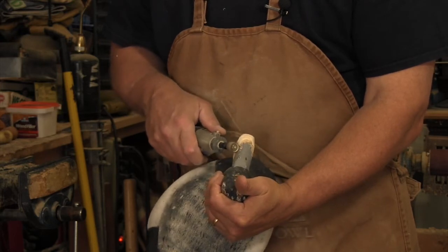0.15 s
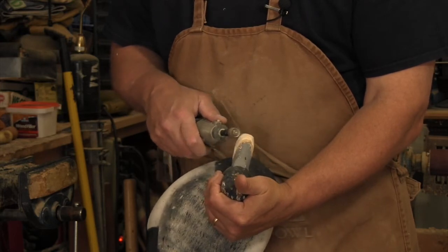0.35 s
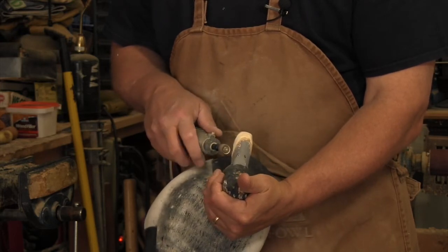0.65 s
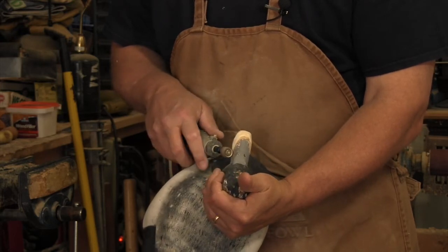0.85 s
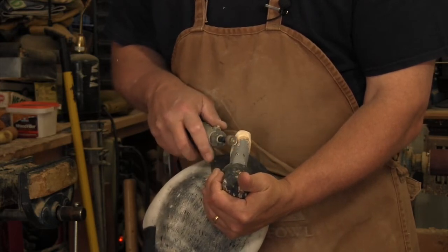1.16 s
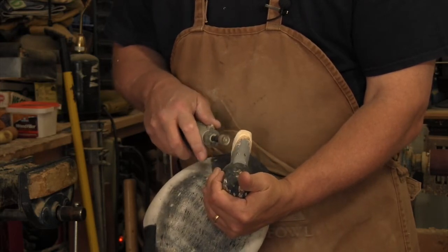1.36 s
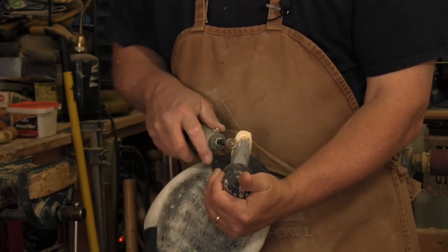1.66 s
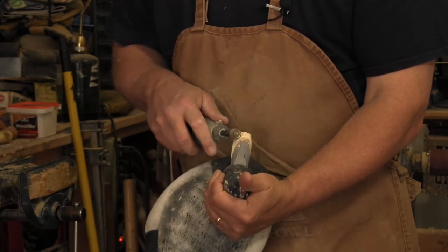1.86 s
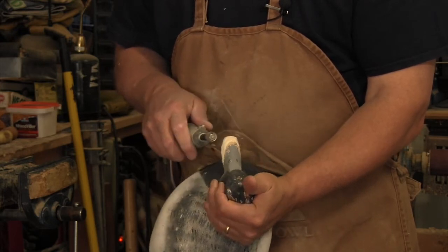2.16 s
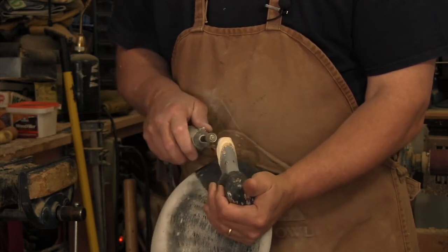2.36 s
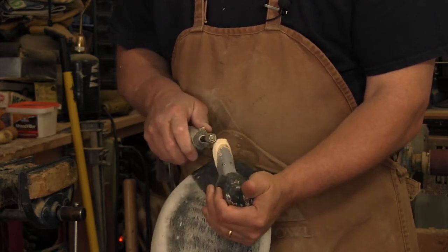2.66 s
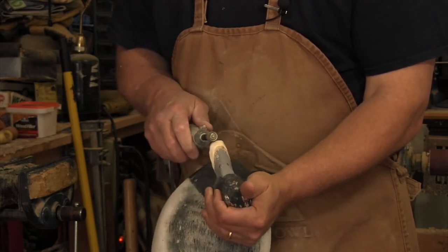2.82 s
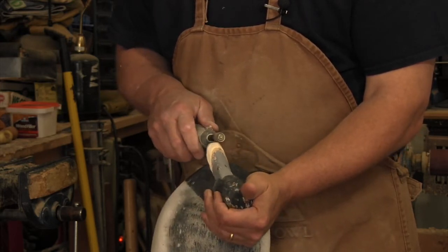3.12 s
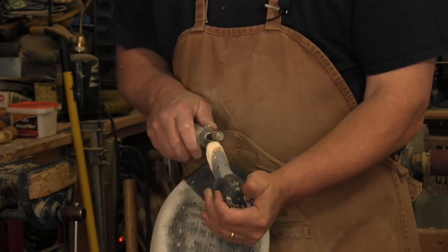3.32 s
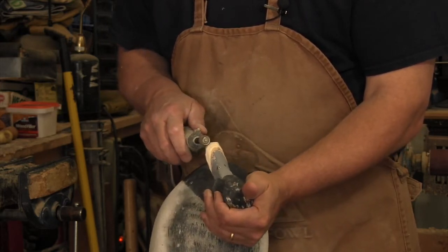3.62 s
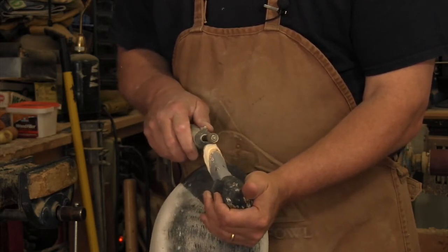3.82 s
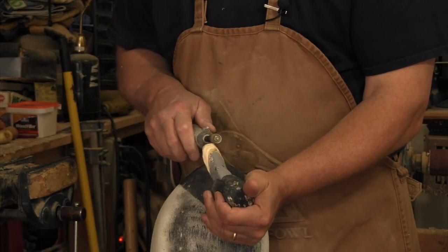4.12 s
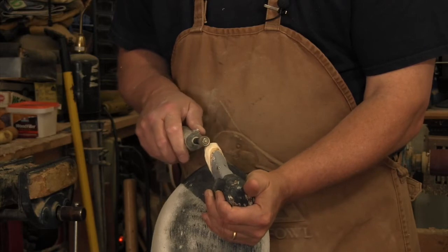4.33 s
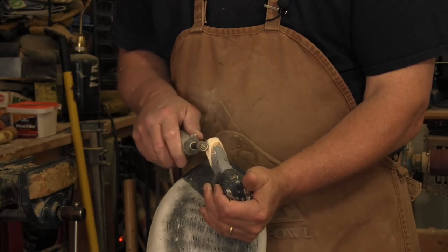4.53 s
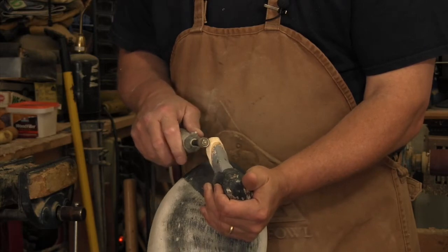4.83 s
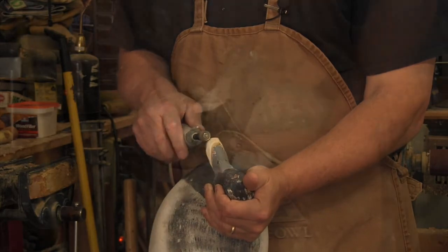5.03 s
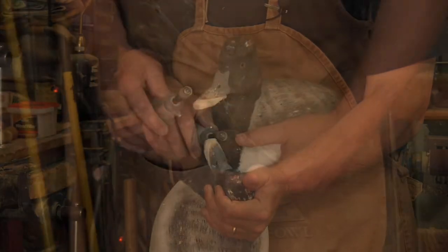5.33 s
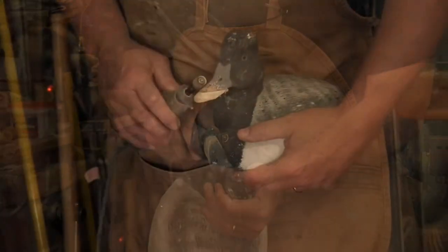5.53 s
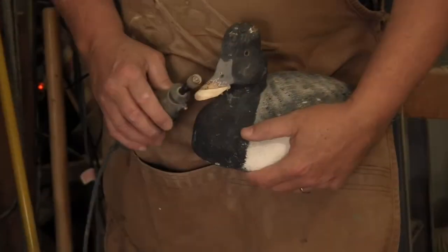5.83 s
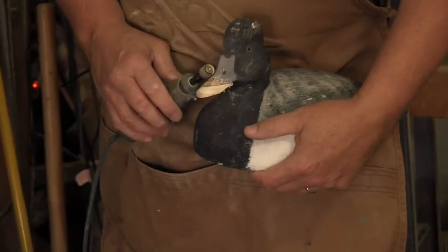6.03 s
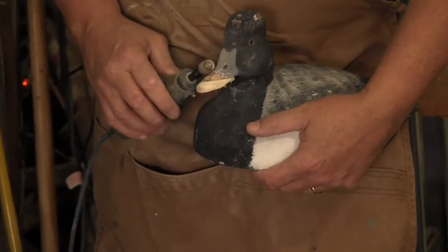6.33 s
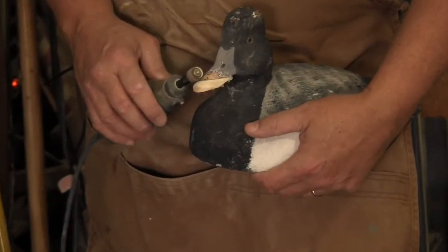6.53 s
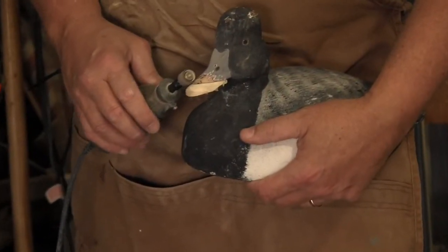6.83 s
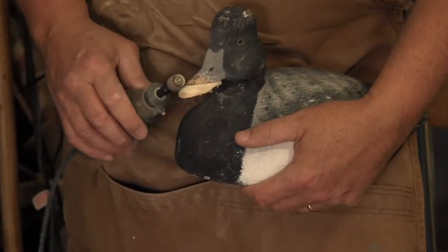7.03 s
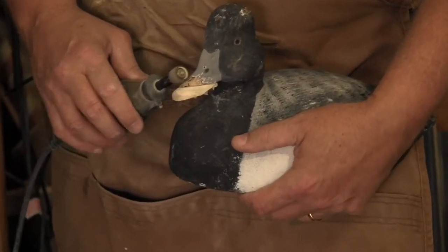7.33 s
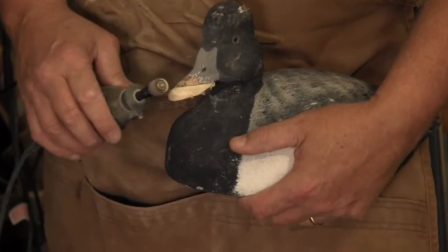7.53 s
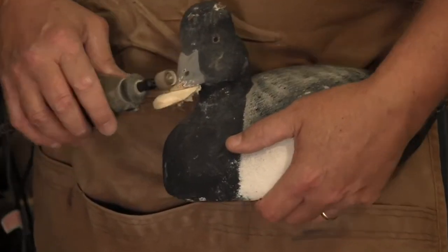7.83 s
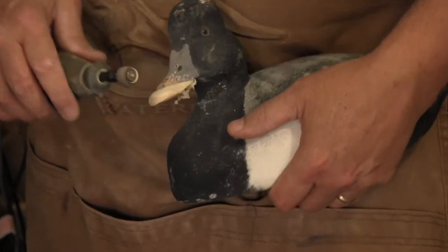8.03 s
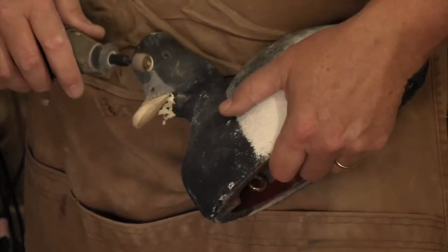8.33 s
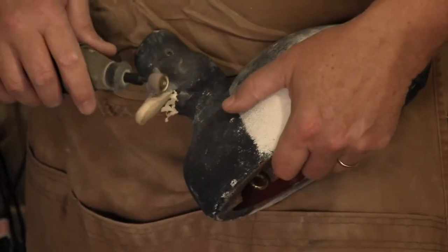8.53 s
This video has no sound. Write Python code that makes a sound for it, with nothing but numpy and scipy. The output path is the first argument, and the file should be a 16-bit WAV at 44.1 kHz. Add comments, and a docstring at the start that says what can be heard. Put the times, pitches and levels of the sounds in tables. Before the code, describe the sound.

A close, dry workshop sound, almost entirely on the left, with only faint crosstalk and hiss on the right. From 0 s a small rotary tool spins very fast: a thin, fluctuating whine near 9 kHz over steady rushing air. Light presses on a wooden decoy from 0.2 s slow it slightly, with gritty buzz and brief squeals around 0.35, 1.3 and 1.8-2 s. It runs freer until about 2.65 s, then chatters again; strong squeals near 3.5 kHz cluster from 4.3 to 5.1 s. Between 5.1 and 5.6 s it cross-fades into a faster, louder, rougher spell. Short rasping strokes ring the hollow wood at 5.6-5.7, 6.0-7.0, 7.1 and 7.5 s, with bouncing bumps around 7.5 and 7.95 s. Then the tool lifts and turns: the air darkens, wavering hiss passes, the whine swells briefly near 8.3 s with a soft handling thud, and the motor keeps running to the end at about 8.6 s.

```python
"""At a carving bench a rotary tool sands the bill of a wooden decoy at about 30000 rpm, in two spells. The
first cross-fades into a faster, rougher one. The motor whines at 18 times its rotation over the rush of cooling
air. In the first spell each press slows it and the chattering drum squeals on multiples of the rotation; in the
second the drum rasps in strokes that ring the wood. The drum's grit repeats on every turn. The sound is in the
left channel; the right is far fainter, and both carry a trace of hiss."""
import sys
import numpy as np
from scipy import signal
from scipy.fft import rfft, irfft, next_fast_len
from scipy.io import wavfile
from scipy.ndimage import map_coordinates

SR = 44100
rng = np.random.default_rng(int(sys.argv[2]) if len(sys.argv) > 2 else 0)


def persist_wave(psi):
    """Save psi, clipped to +-1, as 16-bit WAV."""
    counts = np.round(np.clip(psi, -1, 1) * 32767).astype(np.int16)
    wavfile.write(sys.argv[1], SR, np.atleast_2d(counts).T)


N = 382347
T = np.arange(N) / SR

# All source levels are relative: the channel gains in scene() come after them.
FADE_START_S, FADE_END_S = 5.14, 5.635
GRIT_MEMORY_TURNS = 26   # turns over which the pattern of touching grains is renewed
# Modes of the carving's hollow body. Each row: frequency in Hz, width in Hz, gain in dB.
WOOD_MODES = [(1796, 150, 9.5), (2156, 97, 2.5), (2704, 135, 4), (6000, 4100, -3)]


def from_db(db):
    """Decibels to gain."""
    return 10 ** (np.asarray(db) / 20)


def rms_one(x):
    """Scale to an rms of 1."""
    return x / np.sqrt(np.mean(x ** 2) + 1e-20)


def in_time(rows):
    """Each column of a curve, interpolated sample by sample."""
    s, *columns = np.transpose(rows)
    return [np.interp(T, s, column) for column in columns]


def ramp(start_s, end_s):
    """Rises from 0 to 1 between two times."""
    return np.clip((T - start_s) / max(end_s - start_s, 1e-3), 0, 1)


def noise():
    """White noise."""
    return rng.standard_normal(N)


def drift(rate):
    """Smooth random drift with a spread of 1, changing about rate times a second."""
    step = 40   # samples per computed point
    r = np.exp(-2 * step * np.pi * rate / SR)
    settle = 2000
    chance = rng.standard_normal(N // step + settle + 2)
    slow = signal.lfilter([1], [1, -2 * r, r * r], chance)[settle:]
    return np.interp(np.arange(N) / step, np.arange(len(slow)), rms_one(slow))


def colour(x, spectrum):
    """Filter by a spectrum drawn in dB over log frequency; rms 1."""
    hz, db = np.transpose(spectrum)
    size = next_fast_len(N, real=True)
    bins_hz = np.maximum(np.fft.rfftfreq(size, 1 / SR), 1)
    gain = from_db(np.interp(np.log(bins_hz), np.log(hz), db))
    return rms_one(irfft(rfft(x, size) * gain, size)[:N])


def resonate(x, hz, width_hz):
    """One two-pole resonance with a peak gain of 1."""
    r = np.exp(-np.pi * width_hz / SR)
    b = np.array([1, 0, -1]) * (1 - r * r) / 2
    a = [1, -2 * r * np.cos(2 * np.pi * hz / SR), r * r]
    return signal.lfilter(b, a, x + 1e-18)


def shaft(turns_per_s, wobble):
    """Turns made so far by a shaft whose speed wobbles slightly."""
    return np.cumsum(turns_per_s * (1 + wobble * drift(26.0))) / SR


def tone(turns, multiple, flutter_db):
    """A line locked to the shaft, fluttering in level; rms near 1."""
    phase = 2 * np.pi * (multiple * turns + rng.random())
    return np.sqrt(2) * np.sin(phase) * from_db(flutter_db * drift(17.3))


def handling(width_hz, length_s):
    """Soft thuds, resonated noise in short swells, as the carving is shifted in the hand."""
    # Each row: time in seconds, level in dB, frequency in Hz.
    thuds = [(1.128, -58, 402), (8.285, -55.5, 208)]
    total = np.zeros(N)
    for s, db, hz in thuds:
        body = resonate(resonate(noise(), hz, width_hz), hz, width_hz)
        total += from_db(db) * rms_one(body) * np.exp(-((T - s) / length_s) ** 2)
    return total


def vent_hiss(width_hz):
    """A narrow band of hiss that wanders as the vents swing past the microphone."""
    # Each row: time in seconds, centre in Hz, level in dB.
    path = [(7.9, 6760, -63), (8.08, 6600, -48), (8.17, 6560, -64), (8.33, 5650, -71), (8.39, 5600, -51),
            (8.48, 5700, -59), (8.58, 6200, -57)]
    hz, db = in_time(path)
    angle = 2 * np.pi * np.cumsum(hz) / SR
    band = drift(width_hz) * np.cos(angle) + drift(width_hz) * np.sin(angle)
    return from_db(db) * rms_one(band)


def first_air():
    """Cooling air of the first spell: steady coloured noise."""
    # Each row: frequency in Hz, relative density in dB per Hz.
    spectrum = [(40, -130), (110, -113), (300, -95.5), (600, -86.5), (1100, -85.5), (1900, -79.5),
                (2500, -84), (3600, -87.5), (5500, -91.5), (7200, -93.5), (8600, -96.5), (10500, -108),
                (15000, -131)]
    return from_db(-48.5) * colour(noise(), spectrum)


def second_air(turned):
    """Cooling air of the second spell, changing colour as the vents turn away."""
    # Spectra before and after the turn. Each row: frequency in Hz, relative density in dB per Hz.
    facing_spectrum = [(40, -130), (300, -88), (600, -73.5), (1100, -81.5), (1900, -70), (2500, -77),
                       (3600, -77.5), (5500, -78), (7200, -80.5), (7800, -89.5), (9500, -87),
                       (10300, -91.5), (11500, -112), (15000, -125)]
    turned_spectrum = [(40, -120), (300, -92), (600, -75), (1200, -82.5), (2100, -73.5), (2500, -80.5),
                       (3500, -86.5), (4300, -80), (4800, -87.5), (5600, -83.5), (7200, -93.5), (8400, -99),
                       (9300, -89), (10500, -107), (15000, -133)]
    facing = from_db(-41.5) * colour(noise(), facing_spectrum)
    away = from_db(-44.5) * colour(noise(), turned_spectrum) * from_db(1.6 * drift(27))
    return np.sqrt(1 - turned) * facing + np.sqrt(turned) * (away + vent_hiss(width_hz=190))


def housing_ring():
    """The housing rings steadily near 1458 Hz."""
    cycles = 1458 * T + .07 * drift(10)
    return from_db(-55.0) * tone(cycles, 1, flutter_db=-1.0)


def first_tones(turns):
    """Motor lines of the first spell; the fractional one comes from the bearings."""
    # Each row: multiple of the rotation, level in dB.
    lines = [(2.55, -62.5), (8, -62)]
    return sum(from_db(db) * tone(turns, k, flutter_db=2.0) for k, db in lines)


def second_tones(turns, turned):
    """Motor and bearing lines of the second spell, blurred by play in the bearings."""
    # Each row: multiple of the rotation, level in dB, change in dB once the tool is turned.
    lines = [(1, -57.5, -0.5), (2, -63.5, 0.5), (3, -54, -18), (4, -64, 9.5), (5.11, -55, -6.5),
             (10.22, -54.5, -8)]
    rattling = turns + 0.0066 * drift(45)
    return sum(from_db(db + change_db * turned) * tone(rattling, k, flutter_db=3.0)
               for k, db, change_db in lines)


def bearing(turns, turned):
    """Ball passes, 2.555 per turn, louder once the housing faces the microphone."""
    return from_db(-55.5 + 3.2 * turned) * tone(turns, 2.555, flutter_db=3.0)


def first_whine(turns):
    """Motor whine of the first spell, close to 18 times the rotation."""
    # Each row: time in seconds, level in dB.
    level = [(0.0, -56), (0.2, -47), (0.34, -66), (0.76, -46), (1.04, -59), (1.3, -51.5), (1.46, -59),
             (1.9, -56), (2.12, -45.5), (2.38, -77), (2.46, -43), (3.06, -47), (3.52, -55), (4.02, -58),
             (4.1, -51), (5.1, -78), (5.42, -54)]
    db, = in_time(level)
    return from_db(db) * tone(turns, 18.03, flutter_db=2.0) * (1 - ramp(FADE_END_S, 5.7))


def motor_speed(load):
    """The motor sags under load and creeps back towards its free speed: turns per s."""
    free_turns_per_s, start_turns_per_s, inertia_s = 528.9, 511.2, .565
    r = np.exp(-1 / (inertia_s * SR))
    sag, _ = signal.lfilter([1 - r], [1, -r], load, zi=[free_turns_per_s - start_turns_per_s])
    return free_turns_per_s - sag


def presses(bite_s, spread_s):
    """Load comes as the drum bites; buzz and thrum swell and fade as the contact spreads."""
    # Each row: start in seconds, end in seconds, load as turns per s it would cost if held,
    # buzz in dB, thrum in dB.
    rows = [(0.193, 0.406, 48, -51.5, -53), (0.412, 0.515, 4.3, -65, -54.5), (1.048, 1.105, 56, -51, -64),
            (1.105, 1.199, 59, -52, -44.5), (1.202, 1.353, 59, -48, -62), (1.635, 1.831, 39.6, -55, -57.5),
            (1.828, 2.003, 75, -49.5, -58.5), (2.679, 2.914, 14.1, -71, -64),
            (2.908, 3.255, 25.3, -52, -63), (3.321, 3.833, 17, -56.5, -71),
            (3.832, 4.025, 36.5, -51, -60.5), (4.156, 4.363, 38, -51.5, -57),
            (4.375, 4.558, 24.3, -53, -66), (4.545, 4.778, 43, -55.5, -55),
            (4.883, 5.079, 51.5, -58, -54.5), (5.044, 5.375, 40.1, -52, -58.5)]
    load, buzz, thrum = np.zeros((3, N))
    for start, end, cost, buzz_db, thrum_db in rows:
        bite = ramp(start - bite_s / 2, start + bite_s / 2) - ramp(end - bite_s / 2, end + bite_s / 2)
        contact = (ramp(start - spread_s / 2, start + spread_s / 2)
                   - ramp(end - spread_s / 2, end + spread_s / 2))
        load += cost * bite
        buzz += contact * from_db(buzz_db)
        thrum += contact * from_db(thrum_db)
    return np.maximum(load, 0), buzz, thrum


def strokes(attack_s, release_s, sag_s):
    """Each stroke bites quickly, eases and lifts: gains of its rasp, the bill's ring and its buzz."""
    # Each row: start in seconds, end in seconds, rasp in dB, ring of the bill in dB, bright buzz in dB.
    rows = [(5.617, 5.705, -37, -54, -49.5), (5.72, 5.732, -40, -40.5, -49), (6.033, 6.066, -39, -66, -44),
            (6.128, 6.195, -39.5, -63, -42), (6.187, 6.252, -35, -64, -53), (6.33, 6.385, -44, -50.5, -54),
            (6.423, 6.53, -41, -56, -41.5), (6.528, 6.576, -37.5, -50.5, -43),
            (6.712, 6.772, -39, -51, -61), (6.838, 6.908, -34.5, -53, -43.5),
            (6.927, 6.991, -34.5, -47.5, -54), (7.112, 7.179, -37.5, -38.5, -41.5),
            (7.47, 7.49, -37, -49, -60), (7.506, 7.555, -39, -40, -42.5), (7.935, 8.037, -45, -55, -60)]
    gains = np.zeros((3, N))
    for start, end, *levels_db in rows:
        corners_s = [start - attack_s / 2, start + attack_s / 2, end, end + release_s]
        gate = np.interp(T, corners_s, [0, 1, np.exp((start - end) / sag_s), 0])
        gains = np.maximum(gains, np.outer(from_db(levels_db), gate))
    return gains


def grit(turns, memory_turns, size=128):
    """The same grains meet the wood on every turn; their pattern is slowly renewed."""
    fresh = rng.standard_normal((5000, size))   # one row per turn
    track = signal.lfilter([1], [1, -np.exp(-1 / max(memory_turns, 1))], fresh, axis=0).ravel()
    return map_coordinates(track, [turns * size], order=2, mode="nearest")


def scratches(turns, lobe_db, tear_db):
    """Fibres tear at random, in noise whose level follows the drum's uneven side once a turn."""
    return noise() * from_db(lobe_db * np.cos(2 * np.pi * turns) + tear_db * drift(114))


def carving(force, modes):
    """A part of the wooden carving rings in its modes."""
    return sum(from_db(db) * resonate(force, hz, width_hz) for hz, width_hz, db in modes)


def bumps(decay_s, bounce_db):
    """The drum hits the carving and bounces twice, each scuff ringing the wood."""
    # Each row: time in seconds, level in dB.
    hits = [(7.455, -27), (7.51, -27), (7.946, -27.5)]
    force = np.zeros(N)
    for s, level_db in hits:
        for k in range(3):
            age_s = T - s - k * rng.uniform(0.00972, 0.0108)
            decay = np.exp(-np.clip(age_s / decay_s, 0, 30))
            force += (age_s > 0) * decay * from_db(level_db + k * bounce_db)
    soft_drum = signal.butter(2, 4000, fs=SR, output="sos")   # rubber
    scuff = signal.sosfilt(soft_drum, force * noise())
    return from_db(12.5) * carving(scuff, WOOD_MODES)


def thrum(turns, contact_gain):
    """The shaft's unbalance at the rotation, louder through the wood."""
    return np.hypot(from_db(-62.5), contact_gain) * tone(turns, 1, flutter_db=1.0)


def growl(turns, pressure):
    """The uneven drum shakes the wood at 3 and 4 times the rotation."""
    third = from_db(-53.0) * tone(turns, 3, flutter_db=0.0)
    fourth = from_db(-54.5) * tone(turns, 4, flutter_db=4.5)
    return pressure * (third + fourth)


def first_sanding(turns, pressure, buzz_gain):
    """Torn fibres rasp with the pressure; repeating grains buzz."""
    # Torn fibres, then repeating grains. Each row: frequency in Hz, relative density in dB per Hz.
    rasp_spectrum = [(40, -82), (150, -10.5), (600, 2.5), (1800, 7), (3000, 4), (5500, -1), (8000, -18),
                     (15000, -49)]
    grit_spectrum = [(100, -25), (1500, 6), (3600, 1.5), (8500, -1.5), (10000, -13.5), (11200, -14),
                     (12500, -5.5), (15000, -32)]
    torn = scratches(turns, lobe_db=-2.5, tear_db=4.0)
    rasp = from_db(-50.0) * pressure * colour(torn, rasp_spectrum)
    buzz = buzz_gain * colour(grit(turns, GRIT_MEMORY_TURNS), grit_spectrum)
    return rasp + buzz * from_db(4.3 * drift(6.3))


def second_sanding(turns):
    """Strokes of torn fibres and grains drive the body and bill; the drum skips over the grain."""
    # Torn fibres, then repeating grains. Each row: frequency in Hz, relative density in dB per Hz.
    rasp_spectrum = [(40, -54), (400, -3), (1150, -4.5), (1600, 2), (3200, -1), (4500, -4.5), (8000, -15),
                     (10800, -12.5), (15000, -50)]
    grit_spectrum = [(3000, -25), (5500, -29), (7000, 6), (8200, 9), (9500, -13), (12000, -30),
                     (13000, -11.5), (15000, -36)]
    # Modes of the thin bill. Each row: frequency in Hz, width in Hz, gain in dB.
    bill_modes = [(3180, 500, 3.5), (3800, 220, 2), (4350, 250, -2.5)]
    rasp_gain, bill_gain, buzz_gain = strokes(attack_s=0.016, release_s=0.043, sag_s=0.88)
    grains = rms_one(grit(turns, GRIT_MEMORY_TURNS))
    torn = rms_one(scratches(turns, lobe_db=2.0, tear_db=2.5))
    cutting = colour(torn + from_db(0.5) * grains, rasp_spectrum)
    body = rms_one(carving(cutting, WOOD_MODES))
    rasp = rasp_gain * (from_db(-12.5) * cutting + from_db(-2.5) * body)
    bill = bill_gain * rms_one(carving(cutting, bill_modes))
    buzz = from_db(-2.0) * buzz_gain * colour(grains + .5 * noise(), grit_spectrum)
    judder = from_db(1.26 * drift(140))
    return (rasp + bill + buzz) * judder


def squeals(turns, pressure, fitful_db, swell_share, ring_s, tail_db, tail_s_times_multiple,
            flutter_db, side_db, rough, slip_turns):
    """Stick-slip locks onto multiples of the rotation: faint chatter and bursts, pulsing once a turn."""
    # Faint chatter under any press. Each row: multiple of the rotation, level in dB at full load.
    chatter = [(5, -62), (7, -60), (14, -63), (15, -62.5)]
    # Bursts. Each row: start in seconds, end in seconds, multiple of the rotation, level in dB.
    bursts = [(0.338, 0.385, 10, -47), (0.335, 0.37, 11, -34), (1.07, 1.155, 10, -48),
              (1.233, 1.334, 11, -39.5), (1.773, 1.791, 11, -45), (1.786, 1.852, 7, -45.5),
              (1.843, 1.872, 11, -34.5), (1.882, 1.948, 11, -40), (1.94, 1.967, 7, -35.5),
              (1.966, 1.982, 11, -37.5), (2.669, 2.669, 7, -33.5), (2.667, 2.707, 8, -44),
              (2.68, 2.699, 7, -39.5), (2.7, 2.88, 7, -53), (2.829, 3.019, 12, -49.5),
              (2.828, 3.029, 16, -53), (2.857, 3.08, 15, -52), (2.978, 3.057, 5, -39.5),
              (3.115, 3.159, 5, -45.5), (3.198, 3.246, 5, -44), (3.358, 3.389, 5, -41),
              (3.475, 3.555, 5, -46), (3.6, 3.921, 7, -51.5), (3.935, 3.958, 7, -40.5),
              (4.167, 4.201, 7, -40), (4.162, 4.24, 5, -45.5), (4.281, 4.352, 14, -43),
              (4.284, 4.34, 5, -35), (4.29, 4.422, 17, -48.5), (4.31, 4.373, 7, -41),
              (4.389, 4.415, 7, -37), (4.429, 4.459, 7, -33.5), (4.513, 4.517, 7, -35.5),
              (4.535, 4.546, 7, -31.5), (4.563, 4.586, 7, -28.5), (4.594, 4.715, 7, -29.5),
              (4.73, 4.767, 7, -36.5), (4.875, 4.938, 7, -37), (4.935, 4.986, 7, -29.5),
              (5.03, 5.039, 7, -29), (5.035, 5.103, 7, -32), (5.03, 5.099, 8, -38.5),
              (5.031, 5.153, 9, -41.5), (5.128, 5.25, 9, -48.5), (4.95, 5.32, 17, -48),
              (5.06, 5.32, 16, -51.5)]
    levels = {k: pressure * from_db(db + fitful_db * drift(11.3)) for k, db in chatter}
    for start, end, k, level_db in bursts:
        since_s = np.clip(T - end, 0, 1)
        # a burst breaks off quickly and leaves a weaker, lingering squeal
        break_off = np.exp(-np.minimum(since_s / ring_s, 30))
        tail = from_db(tail_db) * np.exp(-since_s * k / tail_s_times_multiple)
        swell = ramp(start, start + swell_share * (end - start))
        gate = swell * np.minimum(break_off + tail, 1)
        levels[k] = np.maximum(levels.get(k, 0), gate * from_db(level_db))
    slipping = turns + slip_turns * drift(41)
    grip = 1 + from_db(side_db) * np.cos(2 * np.pi * turns) + rough * drift(120)
    return grip * sum(level * tone(slipping, k, flutter_db) for k, level in levels.items())


def first_spell():
    """Light presses sag the motor, buzz and squeal; returns running sound, and whine with squeals."""
    full_load_turns_per_s = 94   # load at which the rasp has its nominal level
    load, buzz_gain, thrum_gain = presses(bite_s=0.054, spread_s=0.092)
    turns = shaft(motor_speed(load), wobble=0.0005)
    pressure = (load / full_load_turns_per_s) ** 0.5
    motor = first_air() + first_tones(turns) + housing_ring() + thrum(turns, thrum_gain)
    sanding = growl(turns, pressure) + first_sanding(turns, pressure, buzz_gain)
    squeal = squeals(turns, pressure, fitful_db=6.0, swell_share=0.29, ring_s=0.0054, tail_db=-8.5,
                     tail_s_times_multiple=0.3, flutter_db=1.0, side_db=-20.0, rough=0.15,
                     slip_turns=0.0076)
    return motor + sanding, first_whine(turns) + squeal


def second_spell():
    """Faster, with rasping strokes, then the vents turn away; returns running sound and whine."""
    # Each row: time in seconds, speed in turns per s, whine in dB, fan tone in dB.
    motor_curve = [(5.1, 541.9, -62.0, -63.3), (5.66, 545.5, -43.0, -54.5), (6.82, 542.6, -44.1, -55.9),
                   (7.02, 539.4, -44.7, -52), (7.46, 540.7, -44.2, -56.1), (7.7, 540.5, -54, -54.5),
                   (8.06, 542.9, -66, -55), (8.16, 543.7, -57, -47.5), (8.3, 544.9, -44.3, -47.0),
                   (8.46, 545.7, -65.5, -47.9), (8.66, 546.9, -62.2, -48.6)]
    turns_per_s, whine_db, fan_db = in_time(motor_curve)
    turns = shaft(turns_per_s, wobble=0.00038)
    turned = ramp(7.66, 7.96)
    fan = from_db(fan_db) * tone(turns, 8, flutter_db=1.0)
    motor = second_air(turned) + second_tones(turns, turned) + fan + bearing(turns, turned)
    whine = from_db(whine_db) * tone(turns, 18, flutter_db=1.0) * ramp(5.05, FADE_START_S)
    return motor + second_sanding(turns), whine


def scene():
    """The two spells cross-fade; the right channel is far fainter than the left."""
    fade = ramp(FADE_START_S, FADE_END_S)
    running_1, own_level_1 = first_spell()
    running_2, own_level_2 = second_spell()
    work = np.sqrt(1 - fade) * running_1 + fade * running_2 + own_level_1 + own_level_2
    work = work + bumps(decay_s=0.0039, bounce_db=-5.5) + handling(width_hz=170, length_s=0.019)
    return work * from_db([[6], [-42]])   # left, right


def record(dry):
    """A trace of hiss in both channels; bass and top are cut."""
    hiss = from_db(-77.5) * rng.standard_normal((2, N))
    bass_cut = signal.butter(2, 110, "high", fs=SR, output="sos")
    top_cut = signal.ellip(10, .1, 80, 15400, fs=SR, output="sos")
    return signal.sosfilt(top_cut, signal.sosfilt(bass_cut, dry + hiss))


dry = scene()
out = record(dry)
persist_wave(out)
```